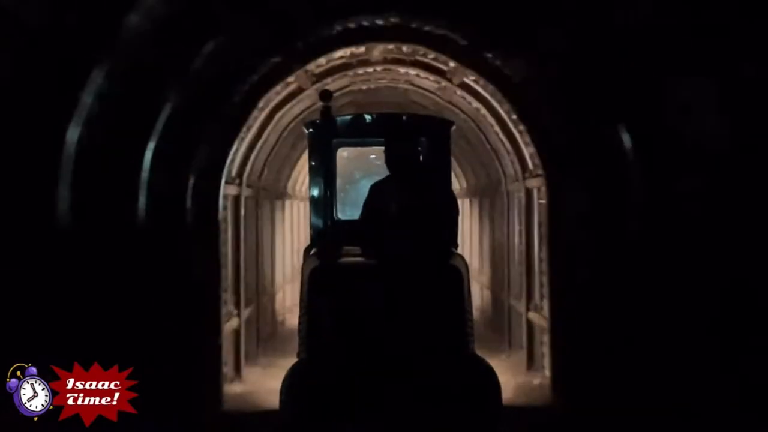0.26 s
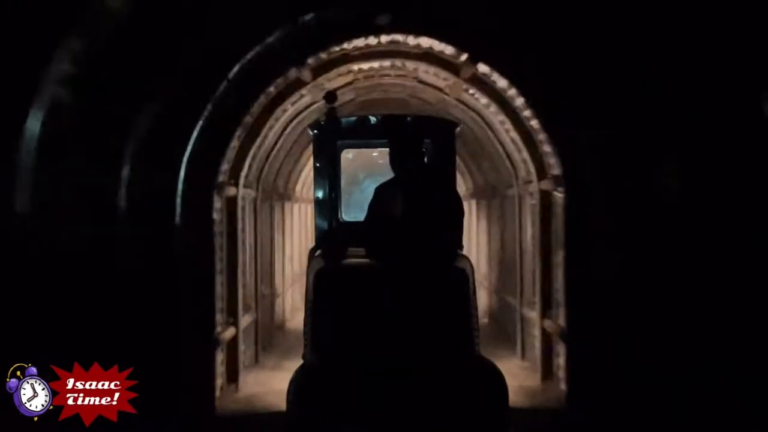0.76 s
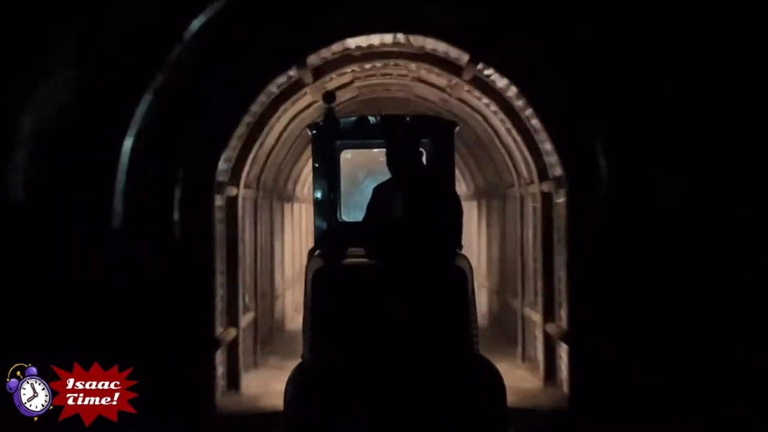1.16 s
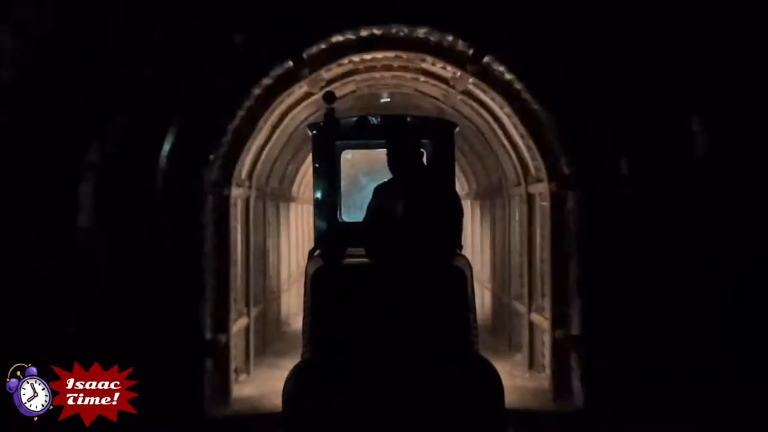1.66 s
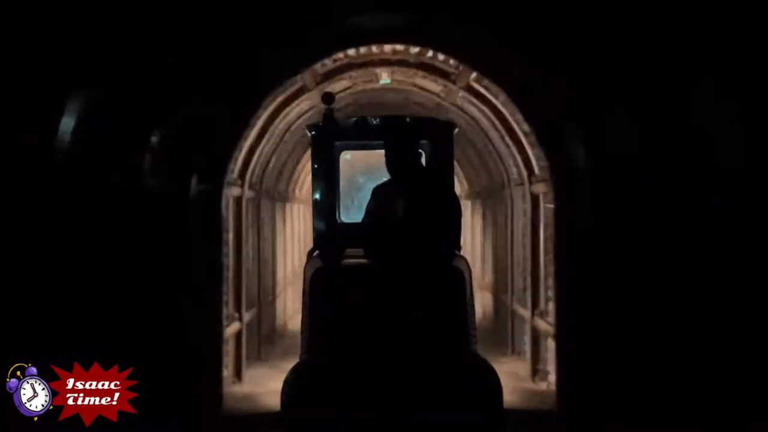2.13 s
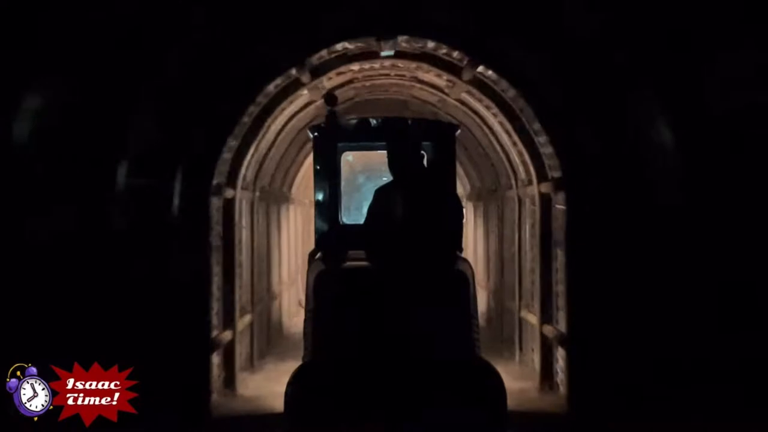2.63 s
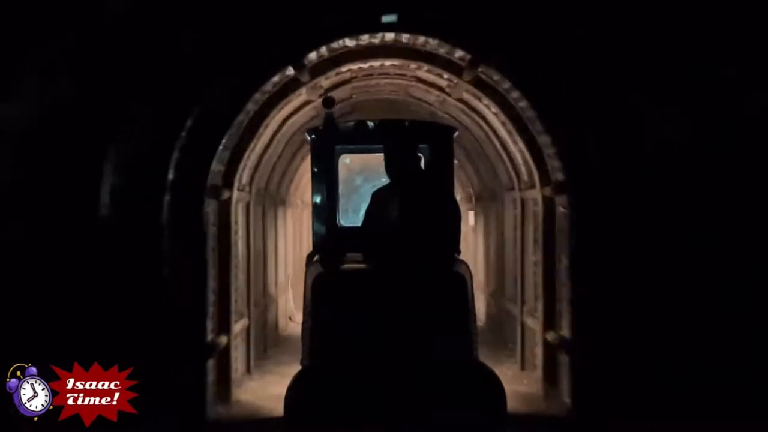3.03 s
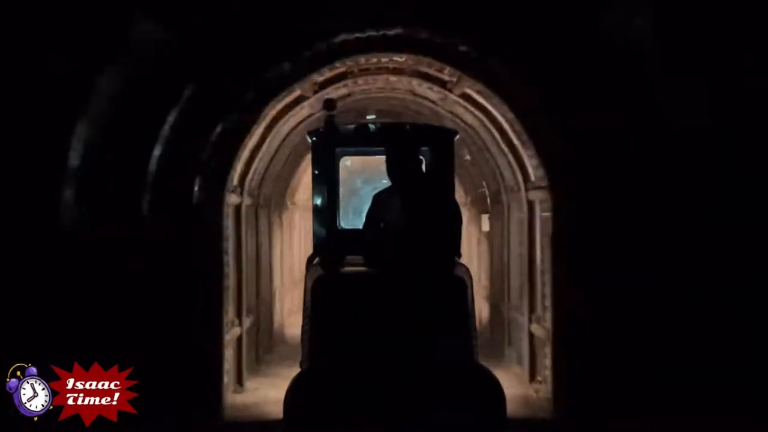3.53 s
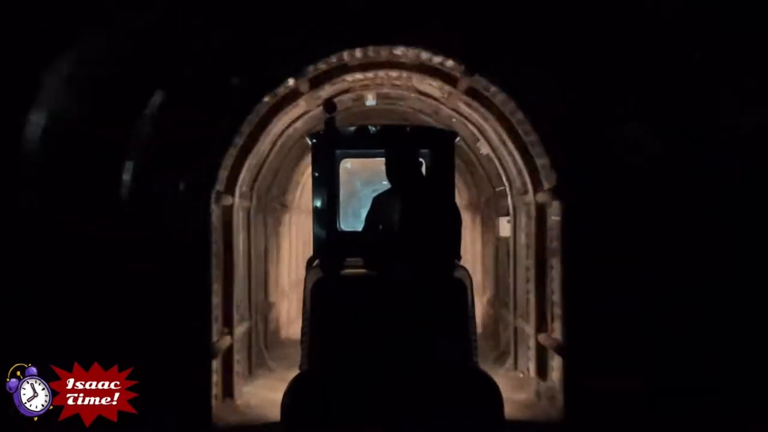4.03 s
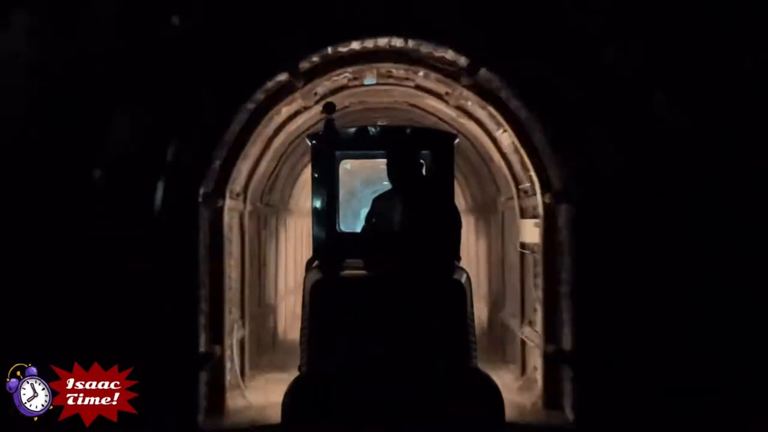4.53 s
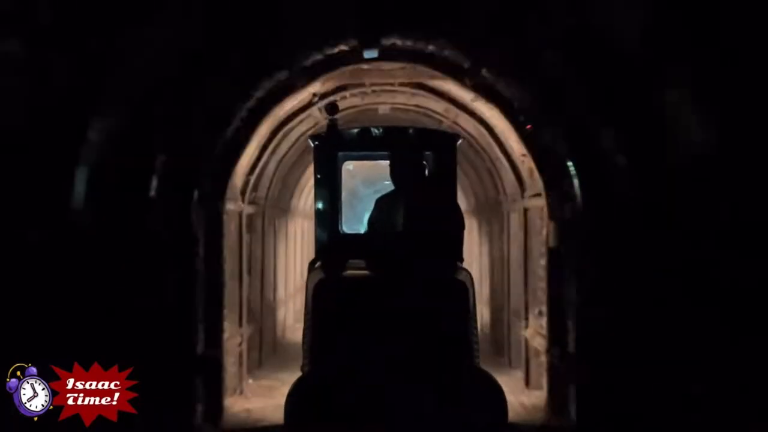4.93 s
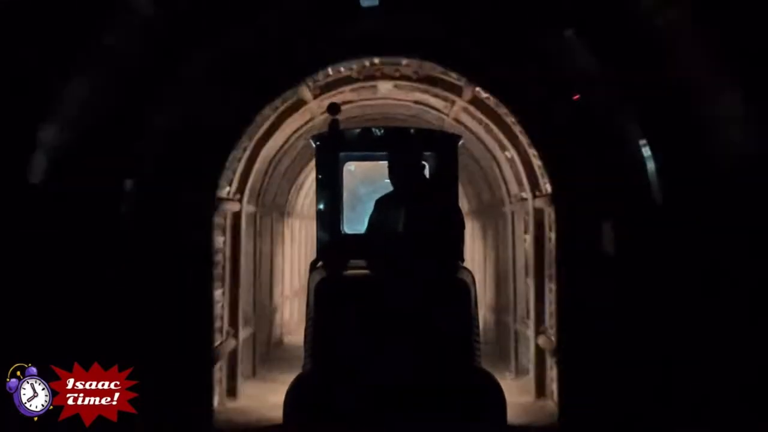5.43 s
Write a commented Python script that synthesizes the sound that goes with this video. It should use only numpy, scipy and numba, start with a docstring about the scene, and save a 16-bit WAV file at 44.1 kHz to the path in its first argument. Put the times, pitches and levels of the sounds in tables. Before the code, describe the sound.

Paired metallic clacks of small train wheels, a low engine throb, rattling fittings and booming car floor, smeared by close tunnel walls.

```python
"""Wheels clack over rail joints in pairs, one axle after the other, above a steady roar and a throbbing engine.
It is a miniature train in a narrow tunnel, heard from a car just behind the three-cylinder locomotive.
Blows are decaying steel tones and noise bursts; rolling is shaped noise; the engine is a stack of sines.
The car body booms in swelling low tones, flanges rub in short wavering notes, and loose parts rattle.
The close walls smear every blow into a dying wash."""
import sys
import numpy as np
from scipy import signal
from scipy.fft import rfft, irfft
from scipy.io import wavfile
from scipy.ndimage import uniform_filter1d
from numba import njit

SR = 44100
rng = np.random.default_rng(int(sys.argv[2]) if len(sys.argv) > 2 else 0)


def log_audio(samples):
    """Write samples as a 16-bit WAV file to the path given in sys.argv[1]."""
    # one column per channel
    frames = np.atleast_2d(samples).T
    # limit to full scale, then quantise
    limited = np.clip(frames, -1, 1)
    pcm = np.round(limited * 32767).astype(np.int16)
    wavfile.write(sys.argv[1], SR, pcm)


N = 250929
TIME = np.arange(N) / SR
FREQS = np.fft.rfftfreq(N, 1 / SR)

# All levels in the tables are relative: the functions add their own trims.
# Wheels strike rail joints, mostly in pairs an axle spacing apart, with lighter knocks from the cars behind:
# t/s, thud level/dB, thud pitch f/Hz, knock level/dB, clank level/dB, clatter level/dB, tick level/dB
JOINTS = [(0.19, -15.5, 468, -25, -18, -23.5, -39.5), (0.317, -16.5, 492, -29, -22, -23, -39.5),
          (0.42, -18, 508, -28, -29, -29, -45), (0.573, -12.5, 507, -17, -22, -21, -39.5),
          (0.652, -23, 520, -25, -29, -32, -40.5), (0.8, -14, 560, -22, -21, -23.5, -43),
          (0.925, -9.5, 485, -16.5, -23, -20.5, -42), (0.955, -21, 650, -17, -29, -30, -50),
          (1.399, -9.5, 407, -13, -22, -18.5, -42), (1.525, -6.5, 436, -13, -17.5, -16.5, -42),
          (1.764, -7.5, 416, -17, -19.5, -20.5, -40), (1.897, -14, 410, -13.5, -15, -20, -38),
          (1.963, -23, 524, -24, -26, -23, -46), (2.103, -18, 480, -30, -19.5, -22.5, -41.5),
          (2.377, -16, 600, -23, -19.5, -19.5, -39), (2.502, -14, 540, -26, -29, -20.5, -39),
          (2.61, -17, 506, -23, -19, -20.5, -39), (2.66, -22, 493, -28, -24, -31, -53),
          (2.752, -17.5, 474, -32, -16, -17, -38), (2.837, -19, 550, -28, -23, -28, -40),
          (2.865, -33, 525, -26, -20, -30, -50), (2.981, -32, 560, -19, -15, -17.5, -38),
          (3.106, -16, 500, -18, -14.5, -17.5, -38), (3.185, -18, 390, -34, -33, -39, -48),
          (3.58, -7.5, 417, -13.5, -15.5, -17, -35.5), (3.708, -11.5, 374, -24, -12, -14.5, -36),
          (3.949, -6.5, 403, -14, -14, -15.5, -35), (4.079, -12.5, 425, -14, -14.5, -16, -33),
          (4.134, -22, 560, -21, -19, -20.5, -42), (4.278, -26, 500, -23, -24, -19, -39),
          (4.373, -26, 382, -30, -20, -38, -44), (4.559, -16, 480, -22, -12.5, -18, -36),
          (4.692, -17, 462, -23, -11, -18, -37), (4.788, -28, 484, -21, -22, -17, -36.5),
          (4.798, -11, 470, -21, -20.5, -24, -46), (4.923, -21, 493, -25, -20, -20.5, -39),
          (4.937, -15, 450, -18, -20, -17, -35), (4.975, -27, 496, -30, -23, -22.5, -36.5),
          (5.028, -26, 500, -27, -19.5, -23.5, -39.5), (5.166, -13.5, 410, -26, -15, -23, -36.5),
          (5.19, -16, 450, -26, -18, -25, -40), (5.291, -10.5, 485, -18, -14.5, -17.5, -35.5)]
# Strength of the rolling steel over time: t/s, roar level/dB, hiss level/dB
ROLLING_LEVEL = [(0.0, -22, -29.5), (0.76, -21, -29), (1.0, -22, -28.5), (2.46, -21.5, -28.5),
                 (2.93, -22.5, -27.5), (3.31, -23, -29), (4.09, -21.5, -29), (4.45, -23, -30),
                 (4.93, -23.5, -28), (5.69, -23, -30)]
# Strength of the rumble in the frame over time: t/s, level/dB
FRAME_LEVEL = [(0.0, -28), (0.1, -26), (0.5, -23.5), (1.05, -28), (1.4, -27.5), (1.73, -27), (2.0, -26),
               (2.95, -22.5), (3.12, -30.5), (3.72, -23.5), (4.22, -31), (4.35, -24), (4.48, -29.5),
               (5.01, -21), (5.69, -27.5)]


def clacks(chatter_db=4.0, wheel_db=-6.5, knock_db=0):
    """A rail joint thuds in the bogie, knocks the rail end, rings the wheel, and clanks, clatters and ticks."""
    # spectra of the steel noises: f/Hz, level/dB
    clank_spectrum = [(150, -34), (330, 9), (500, -3), (650, -2), (830, 4), (1050, 3.5), (1350, 0),
                      (1800, -15), (3000, -49)]
    clatter_spectrum = [(800, -31), (1500, 1), (1950, -0.5), (2300, 0), (3100, 0), (4000, -4.5),
                        (5000, -10), (7000, -44)]  # the couplings
    tick_spectrum = [(3000, -24), (5000, 7.5), (6500, 9.5), (8500, -1.5), (11000, 6.5), (14000, -53),
                     (15500, -36)]  # steel on steel
    snap_spectrum = [(1500, -20), (3500, -3), (7000, -15), (9000, -6), (12000, 12), (15000, 8)]  # brief first contact
    # what a hard blow rings in the wheel: f/Hz, level/dB, t60/s, phase between the ears/rad
    wheel_modes = [(1196, 2.5, 0.049, 1.6), (1356, 2, 0.058, 2), (1886, -1, 0.07, 2.9),
                   (2000, -9, 0.031, 1.4), (2640, -3.5, 0.045, 1.1), (3155, -3, 0.032, 1.6),
                   (3490, -14, 0.03, 3.3), (3970, -9, 0.033, 1.4)]
    # the short hard knock of the rail end: f/Hz, level/dB, t60/s, phase between the ears/rad
    rail_end_modes = [(646, 0.5, .06, 2.5), (728.5, -0.5, 0.072, 2.2), (805, -3, 0.048, 2.2),
                      (874, -2.5, .05, 2.5)]
    times, thud, pitch, knock, clank, clatter, tick = np.transpose(JOINTS)
    attack_s = .0018
    contact = unit(undb(chatter_db * walk(220)))  # contact is made and lost many times within one blow
    steel = blows(times, clank, clank_spectrum, db=-1.0, rise_s=attack_s, t60=0.033,
                  tunnel_db=-2.0, tunnel_t60=0.57, lead_s=0.0012, contact=contact)
    steel += blows(times, clatter, clatter_spectrum, db=-1.5, rise_s=attack_s, t60=0.22,
                   tunnel_db=-1.5, tunnel_t60=0.43, lead_s=0.0031, contact=contact)
    steel += blows(times, tick, tick_spectrum, db=2.0, rise_s=attack_s, t60=0.32,
                   tunnel_db=2.5, tunnel_t60=0.55, lead_s=0.0059, contact=contact)
    steel += blows(times, tick, snap_spectrum, db=0.0, rise_s=attack_s, t60=0.15,
                   tunnel_db=-6, tunnel_t60=0.33, lead_s=0.0018, contact=contact)
    wheel_level = (clank + clatter) / 2 + wheel_db
    wheel = struck(times, wheel_level, [wheel_modes] * len(times), rise_s=attack_s, detune=0.028)
    rail = struck(times - attack_s, knock + knock_db, [rail_end_modes] * len(times),
                  rise_s=attack_s, detune=0.027)
    return thuds(times, thud, pitch) + rail + wheel + steel


def thuds(times, levels, pitches, db=-2.5, t60=0.062, ears_rad=1.0, ring_db=-7, ring_lag_s=0.00806):
    """The wheel drops into the gap: one short hollow knock, and the bogie rings on more softly."""
    # what a blow rings in the bogie: f/Hz, level/dB, t60/s, phase between the ears/rad
    bogie_modes = [(348, 7, 0.055, 0.44), (389.4, 6.5, 0.11, 0.17), (445.6, -4.5, 0.26, 1.7),
                   (487.8, 1, 0.25, 0.94), (560, -5, 0.064, 0.54), (680, -4, 0.17, 1.8), (770, -4, 0.16, 1)]
    hollow_modes = [[(hz, 0, t60, ears_rad)] for hz in pitches]
    hollow = struck(times, levels + db, hollow_modes, rise_s=0.0025, detune=0.012)
    bogie = struck(times + ring_lag_s, levels + ring_db, [bogie_modes] * len(times),
                   rise_s=0.0027, detune=0.019)
    return hollow + bogie


def blows(times, levels, spectrum, db, rise_s, t60, tunnel_db, tunnel_t60, lead_s, contact):
    """A blow wakes dense steel modes, heard as chattering noise, and leaves a smooth wash in the tunnel."""
    wash_rise_s = .004  # the first echoes of a blow gather in the tunnel
    direct, wash = np.zeros((2, N + 2 * SR))  # both hold power, so overlapping blows add up
    age = np.arange(SR) / SR
    rise = 1 - np.exp(-(age / rise_s) ** 2)
    build_up = 1 - np.exp(-(age / wash_rise_s) ** 2)
    for s, level in zip(times, levels):
        start = int((s - lead_s) * SR)  # starts slightly ahead of the listed time and builds up softly
        direct[start:start + SR] += rise * (undb(level) * fade(age, t60)) ** 2
        wash[start:start + SR] += build_up * (undb(level + tunnel_db) * fade(age, tunnel_t60)) ** 2
    envelope = np.sqrt(direct[:N] * contact ** 2 + wash[:N])
    return undb(db) * envelope * noise(spectrum)


def struck(times, levels, tables, rise_s, detune):
    """Each blow rings its own table of fading modes, a little out of tune and in any phase."""
    out = np.zeros((2, N + SR))
    age = np.arange(SR // 4) / SR
    for s, level, table in zip(times, levels, tables):
        hz, mode_db, t60, ears = np.transpose(table)[:, :, None]
        tuned_hz = hz * (1 + detune * rng.standard_normal(hz.shape))
        phase = 2 * np.pi * (tuned_hz * age + rng.random(hz.shape))
        modes = undb(mode_db) * fade(age, t60) * (1 - np.exp(-(age / rise_s) ** 2))
        apart = ears * rng.choice([-1, 1], ears.shape) / 2  # either ear may lead
        ring = np.array([(modes * np.sin(phase + ear * apart)).sum(0) for ear in (1, -1)])
        ring /= np.sqrt(np.mean(ring[:, :SR // 50] ** 2))  # the level is the rms of the first 20 ms
        start = int(s * SR)
        out[:, start:start + len(age)] += ring * undb(level)
    return out[:, :N]


def rolling(rumble_db=-1.0, roar_db=2.6, hiss_db=-2.5, lumps_db=2.5, rough_db=0.9, flicker_db=1.0):
    """Rough treads on rough rails: a lumpy rumble in the frame, a roar and a flickering hiss from the steel."""
    # spectra of the three noises: f/Hz, level/dB
    rumble_spectrum = [(50, -24), (75, -13), (110, -18), (145, 4.5), (188, -5.5), (212, 1), (255, 3),
                       (310, -12), (420, -39), (800, -70)]
    roar_spectrum = [(120, 2), (250, -2), (310, -0.5), (500, 0.5), (750, -2), (1050, -9), (1350, -6.5),
                     (1700, -9), (3100, -18.5), (4200, -23), (6000, -49), (12000, -40.5)]
    hiss_spectrum = [(2000, 8), (4000, 8.5), (5500, 2.5), (7500, -3.5), (10000, -7.5), (12000, -3.5),
                     (14500, -10.5), (16000, -55)]
    rumble_level, = curves(FRAME_LEVEL)
    roar_level, hiss_level = curves(ROLLING_LEVEL)
    rumble = undb(rumble_level + rumble_db + lumps_db * walk(12)) * noise(rumble_spectrum)
    roar = undb(roar_level + roar_db + rough_db * walk(25)) * noise(roar_spectrum)
    hiss = undb(hiss_level + hiss_db + flicker_db * walk(40)) * noise(hiss_spectrum)
    return rumble + roar + hiss


def engine(db=-1.0, flutter_db=2.0, drift=0.00282, share=0.2):
    """Three uneven cylinders give tones at multiples of the engine cycle, which swell with the rumble."""
    # exhaust tones: multiple of the engine cycle, rms level/dB
    exhaust = [(3, -44), (4, -61), (5, -57), (6, -30), (7, -37), (8, -34), (9, -38.5), (10, -27.5),
               (11, -36.5), (12, -29.5), (13, -40), (14, -34.5), (15, -39.5), (16, -40), (17, -34.5),
               (24, -35.5), (25, -36.5), (27, -35.5), (36, -48)]
    cycle_hz = 8.458
    cycles = np.cumsum(cycle_hz * (1 + drift * walk(2.2))) / SR
    rumble, = curves(FRAME_LEVEL)
    out = np.zeros(N)
    for order, level in exhaust:
        # short waves flutter most as the walls slide by
        sway_db = flutter_db * min(order / 10, 2) * walk(3)
        tone = np.sin(2 * np.pi * (round(order) * cycles + rng.random()))
        out += undb(level + db + sway_db) * tone
    return np.sqrt(2) * out * undb(share * (rumble - rumble.mean()))


def body(db=0.0, spread_hz=2.9, sway_db=-10, sway_hz=88, throb_db=-1.0):
    """The car floor drums at low resonances: a surge at every lurch, and a wavering tone under the rumble."""
    # booms of the floor when the car lurches: middle t/s, length t/s, f/Hz, level/dB
    booms = [(0.32, .04, 100.4, -25), (0.45, .045, 100.3, -17), (0.597, 0.06, 100, -18.5),
             (0.974, .04, 91.6, -21), (1.158, 0.045, 88, -17), (1.635, 0.038, 90, -17.5),
             (1.982, 0.025, 88, -17), (2.117, 0.044, 97, -17), (2.242, 0.045, 99.3, -19.5),
             (2.394, 0.067, 157, -21), (2.55, .06, 158, -23), (2.7, .06, 212, -22.5),
             (2.767, 0.027, 88, -17), (2.93, .06, 85, -18), (3.18, 0.14, 85, -24),
             (3.527, 0.03, 95.2, -18.5), (4.038, 0.14, 85.3, -16.5), (4.16, 0.024, 88.3, -11),
             (4.16, .06, 142, -22.5), (4.33, .06, 98, -21), (4.61, 0.06, 87.4, -18.5),
             (4.692, .05, 85.6, -17.5), (4.815, 0.052, 86.7, -15), (4.958, 0.06, 87, -11),
             (5.06, .11, 228, -20.5), (5.19, 0.064, 85, -14.5), (5.3, 0.13, 85, -17)]
    jolts = np.zeros(N)
    for s, length, hz, level in booms:
        jolts += swell(s, length, level + db) * np.sin(2 * np.pi * (hz * TIME + rng.random()))
    sway = unit(undb(throb_db * walk(14)) * wavering(sway_hz, spread_hz, 12))
    rumble, = curves(FRAME_LEVEL)
    return np.sqrt(2) * jolts + undb(rumble + sway_db) * sway


def flanges(db=0, spread=0.0054, rough_db=3):
    """A flange rubs the rail and the wheel swells into a rough, unsteady note, then lets go again."""
    # notes of the rubbed wheels: middle t/s, length t/s, f/Hz, level/dB
    rubs = [(0.657, 0.075, 11400, -40), (0.85, .08, 11600, -45), (1.435, 0.068, 732, -19),
            (2.59, .05, 1555, -29), (2.593, 0.076, 10770, -35), (2.684, 0.23, 10350, -50),
            (2.64, 0.17, 620, -26.5), (2.8, .04, 1260, -26), (2.798, .04, 1580, -30),
            (2.89, 0.035, 1110, -26), (2.947, 0.085, 641, -20), (2.994, .6, 1300, -32),
            (3.026, .05, 720, -24), (3.14, .04, 1270, -26), (4.185, 0.085, 687, -19.5),
            (4.23, 0.087, 11450, -39), (5.013, 0.062, 1910, -27), (5.034, 0.075, 727, -24)]
    grip = undb(rough_db * walk(70))
    notes = np.zeros((2, N))
    for s, length, hz, level in rubs:
        both_ears = np.array([wavering(hz, 12 + spread * hz, 140) for ear in range(2)])
        notes += swell(s, length, level + db) * both_ears
    return grip * notes


def rattles(shaken_db=1, jolted_db=-3.5, count=520):
    """Chains and fittings chatter all the time, and jump in a short flurry at every joint."""
    times, _, _, _, _, clatter, _ = np.transpose(JOINTS)
    hiss = curves(ROLLING_LEVEL)[1]
    anytime = rng.integers(0, N, size=count)
    ring_s, settle_s = .12, .011
    late = settle_s * rng.gamma(2, .5, size=(len(times), 5))
    flurry = clatter[:, None] + jolted_db - 3 * late / settle_s  # later bounces are weaker
    shaken = knocks(anytime / SR, hiss[anytime] + shaken_db, ring_s, scatter_db=5.0)
    jolted = knocks((times[:, None] + late).ravel(), flurry.ravel(), ring_s, scatter_db=8.5)
    return tunnel(shaken + jolted, db=-2.5, t60=0.48)


def knocks(times, levels, t60, scatter_db, count=5):
    """Small metal parts knock; each knock rings a few modes of its own, which reach the ears in any phase."""
    # tone colour of the loose steel parts: f/Hz, level/dB
    loose_parts = [(350, 12), (550, 2), (850, 0), (1050, -2), (1350, -3.5), (2000, -4), (3200, -8.5),
                   (4000, -15), (6000, -37)]
    shape = (len(times), count)
    hz = np.exp(rng.uniform(np.log(450), np.log(6000), shape)).ravel()
    mode_t60 = t60 * (hz / 1000) ** -.5  # t60 holds at 1 kHz; higher modes die sooner
    poles = fade(1 / SR, mode_t60) * np.exp(2j * np.pi * hz / SR)
    mode_db = levels[:, None] + scatter_db * rng.uniform(-1.12, 1, shape)
    sizes = undb(mode_db).ravel() * np.sqrt(hz / 1000)
    starts = np.repeat((times * SR).astype(int), count)
    ears = np.array([pings(starts, poles, sizes * np.exp(2j * np.pi * rng.random(len(hz))))
                     for ear in range(2)])
    return irfft(rfft(ears) * undb(across(loose_parts)), N)


@njit
def pings(starts, poles, sizes):
    """A sum of small decaying rings: each spins and shrinks a complex number by its pole at every sample."""
    out = np.zeros(N)
    for k in range(len(starts)):
        z = sizes[k]
        length = int(-5 / np.log(abs(poles[k])))  # until the ring has faded to exp(-5)
        for i in range(starts[k], min(N, starts[k] + length)):
            out[i] += z.imag
            z *= poles[k]
    return out


def tunnel(x, db, t60):
    """The close walls follow a sound with a dense, dying wash, different at each ear."""
    age = np.arange(SR // 2) / SR
    echoes = rng.standard_normal((2, SR // 2)) * fade(age, t60)
    echoes /= np.sqrt(np.sum(echoes ** 2, axis=1, keepdims=True))
    return x + undb(db) * signal.fftconvolve(x, echoes, axes=1)[:, :N]


def noise(spectrum):
    """Coloured stereo noise of rms 1, empty in the deepest bass, its two sides alike or unlike by frequency."""
    # likeness of left and right, negative where they move oppositely: f/Hz, correlation
    likeness = [(210, .97), (260, .85), (300, .2), (385, .6), (460, .1), (900, -.2), (1600, -.1),
                (2500, .3), (4500, .25), (6500, .05), (8600, -.75), (10500, -.05), (12500, .95)]
    low_hz = 46
    gain = undb(across(spectrum)) * (1 - np.exp(-(FREQS / low_hz) ** 6))
    mid, side = rfft(rng.standard_normal((2, N))) * gain
    alike = np.clip(across(likeness), -.85, .99)
    mid = mid * np.sqrt(1 + alike)
    side = side * np.sqrt(1 - alike)
    return unit(irfft(np.array([mid + side, mid - side]), N))


def wavering(hz, spread_hz, rate):
    """A tone of rms 1 whose pitch wanders at random."""
    cycles = np.cumsum(hz + spread_hz * walk(rate)) / SR
    return np.sqrt(2) * np.sin(2 * np.pi * (cycles + rng.random()))


def walk(rate):
    """Smooth random wandering of rms 1, from held random values averaged twice; fast ones repeat."""
    step = int(SR / rate / 2)
    held = np.repeat(rng.standard_normal(1100), step)[:N]
    smooth = uniform_filter1d(np.resize(held, N), step)
    return unit(uniform_filter1d(smooth, step))


def swell(s, length, db):
    """A smooth bell-shaped rise and fall around time s."""
    return undb(db) * np.exp(-(2 * (TIME - s) / length) ** 2)


def fade(age, t60):
    """Exponential decay, 60 dB down after t60."""
    return np.exp(-np.log(1000) * age / t60)


def curves(table):
    """Each column of a time table, joined by straight lines."""
    s, *columns = np.transpose(table)
    return [np.interp(TIME, s, column) for column in columns]


def across(points):
    """Pairs of frequency and value, joined on a log-frequency axis."""
    hz, value = np.transpose(points)
    return np.interp(np.log(FREQS + 1), np.log(hz), value)


def undb(db):
    """Decibels to gain."""
    return 10 ** (np.asarray(db) / 20)


def unit(x):
    """Scale to rms 1."""
    return x / np.sqrt(np.mean(x ** 2))


def scene():
    """Wheel noise rings through the steel, engine, floor and flanges join in; most of it leans to the left."""
    # wheel and frame resonances that colour the steel noise: f/Hz, width f/Hz, boost level/dB
    resonances = [(605, 14, 3), (860, 39, 1.5), (1190, 69, 2.5), (1290, 60, 2.5), (1350, 32, 1.5),
                  (1890, 86, 1.5), (2660, 18, 3), (3100, 32, 0.5), (3320, 39, 3), (3830, 180, 0.5)]
    # the left wall is nearer: f/Hz, left minus right level/dB
    lean = [(100, 2.5), (500, 2.5), (1400, 2.5), (2600, 0.5), (5200, 3), (8500, 0)]
    ringing = undb(sum(db / (1 + (2 * (FREQS - hz) / width) ** 2) for hz, width, db in resonances))
    steel = rfft(clacks() + rolling() + rattles()) * ringing
    mix = steel + rfft(engine() + body() + flanges())
    balance = undb(across(lean) * np.array([[1], [-1]]) / 2)
    return irfft(mix * balance, N)


def record(dry):
    """Peaks beyond full scale are clipped flat, then a steep low-pass cuts the top."""
    top_hz = 15100
    lowpass = signal.ellip(8, .2, 70, top_hz, fs=SR, output="sos")
    return signal.sosfilt(lowpass, np.clip(dry, -1, 1))


dry = scene()
out = record(dry)
log_audio(out)
```